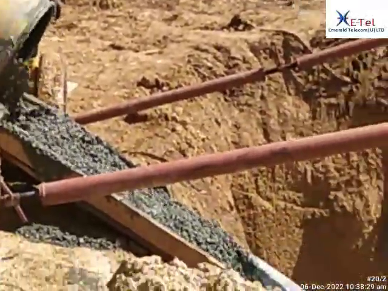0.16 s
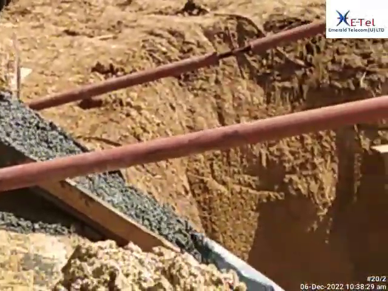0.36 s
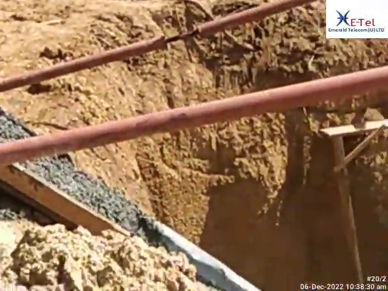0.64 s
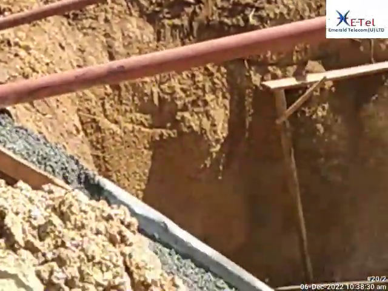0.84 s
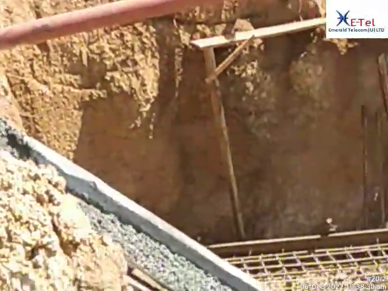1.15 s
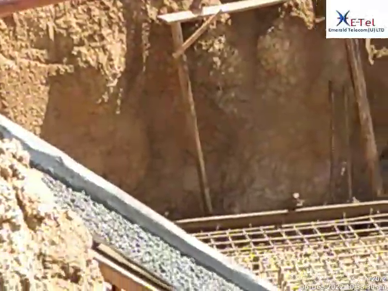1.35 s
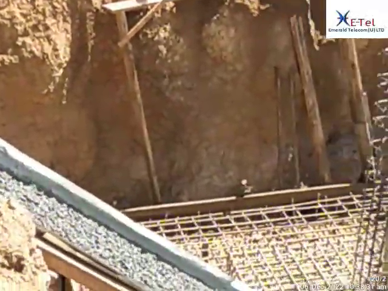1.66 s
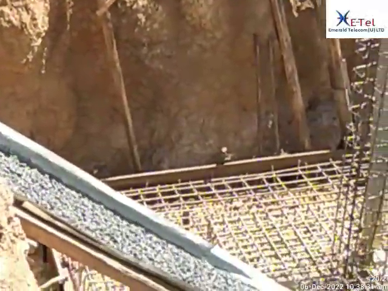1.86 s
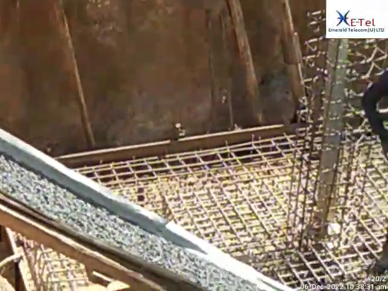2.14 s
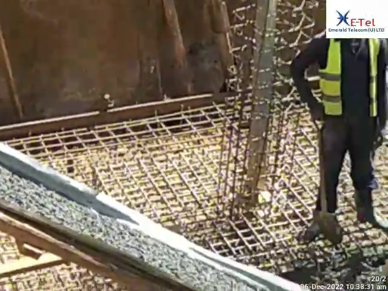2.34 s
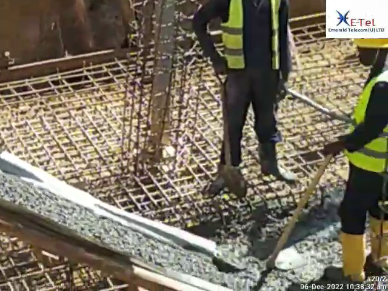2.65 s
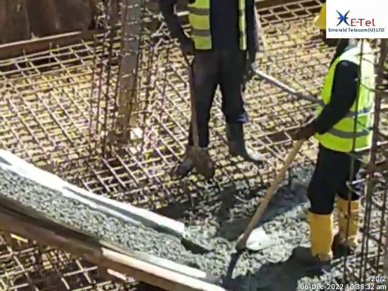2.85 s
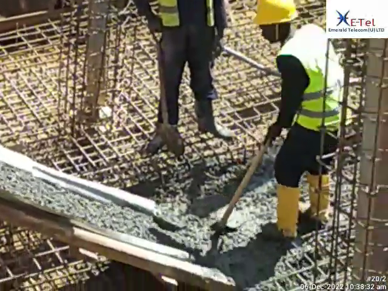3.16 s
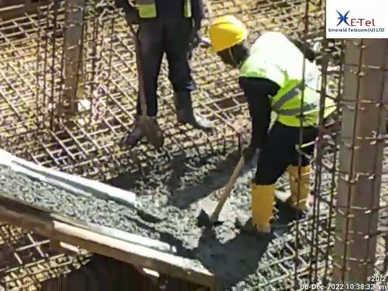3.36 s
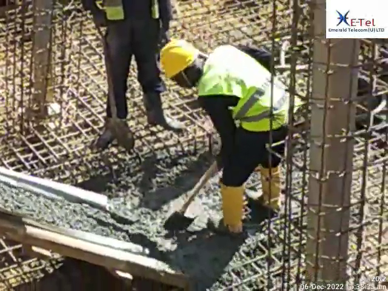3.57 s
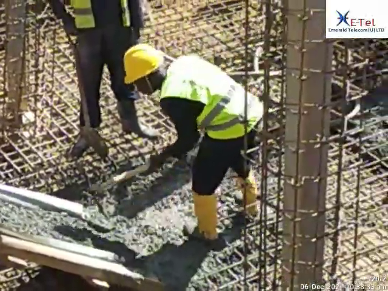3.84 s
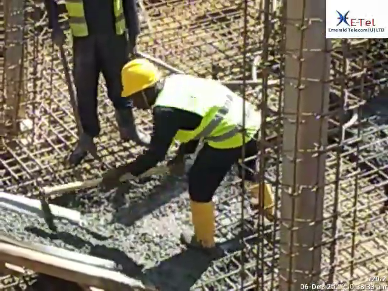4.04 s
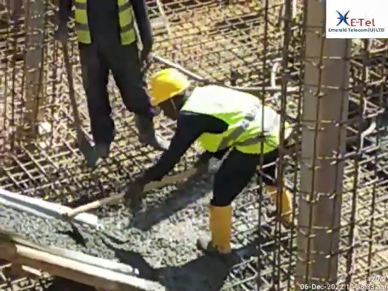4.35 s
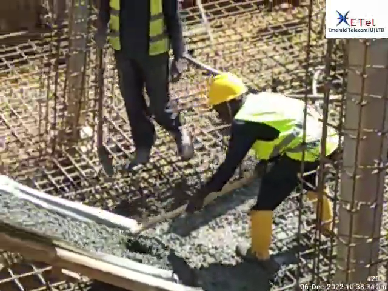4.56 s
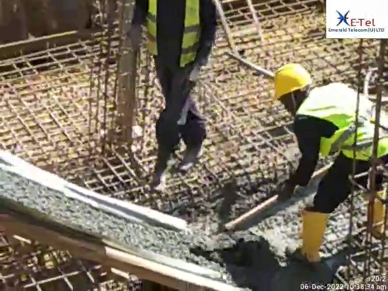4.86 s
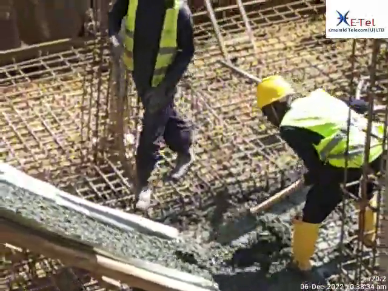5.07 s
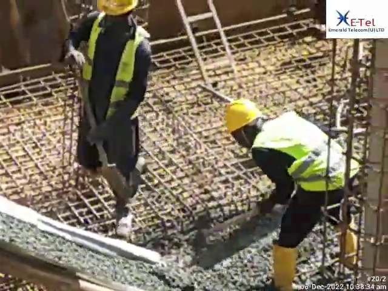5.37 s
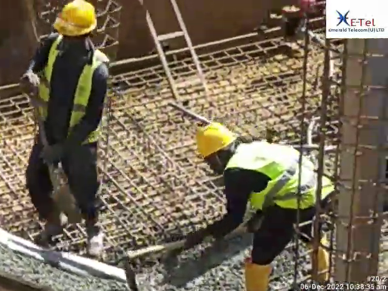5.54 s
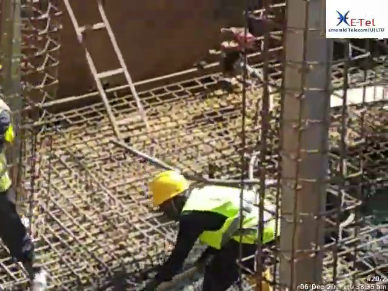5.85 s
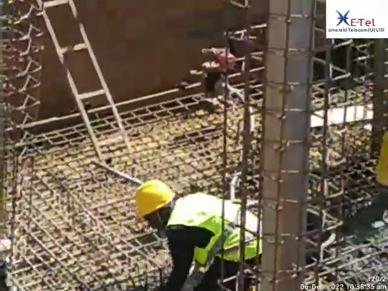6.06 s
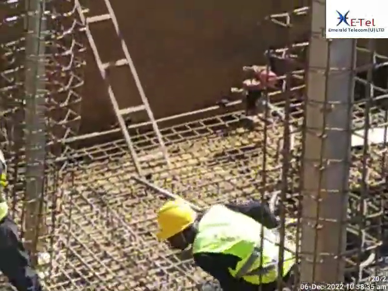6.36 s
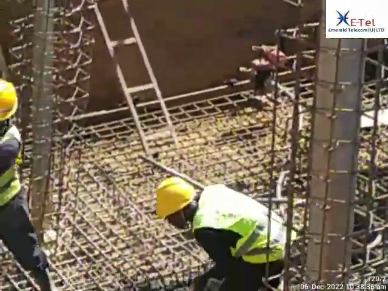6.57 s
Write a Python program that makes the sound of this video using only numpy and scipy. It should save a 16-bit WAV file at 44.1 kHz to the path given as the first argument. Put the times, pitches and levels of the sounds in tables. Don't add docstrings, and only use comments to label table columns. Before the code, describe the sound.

Outdoors at a construction pit, a single-cylinder mixer engine chugs steadily, about eleven dull, hollow knocks a second. Its drum rumbles and thumps unevenly as the load tumbles. Wet concrete slides down a chute throughout with gurgle, stony clatter and bright hiss, the low gurgle strongest at first. Brief hoe scrapes come midway and near the end. Phone microphone, thin bass, slightly gated, patchy treble.

```python
import sys
import numpy as np
from scipy import signal
from scipy.fft import rfft, irfft
from scipy.io import wavfile
from scipy.ndimage import uniform_filter1d

SR = 44100
rng = np.random.default_rng(int(sys.argv[2]) if len(sys.argv) > 2 else 0)


def natural_amplitude(level_db):
    exponent = np.asarray(level_db, float) / 20
    return 10 ** exponent


def to_wav(sig):
    pcm = np.clip(np.atleast_2d(sig), -1, 1) * 32767
    pcm = np.round(pcm).astype(np.int16)
    wavfile.write(sys.argv[1], SR, pcm.T)


N = 295911


def evened(x):
    return x / np.sqrt(np.mean(x ** 2) + 1e-20)


def spectrum_db(points, hz):
    table_hz, db = np.transpose(points)
    return np.interp(np.log(hz + 1), np.log(table_hz + 1), db, -120, -120)


def coloured(noise, points):
    size = noise.shape[-1]
    return irfft(rfft(noise) * natural_amplitude(spectrum_db(points, np.fft.rfftfreq(size, 1 / SR))), size)


def follow(rows):
    return np.interp(np.arange(N) / SR, *np.transpose(rows))


def lumps(per_s):
    t = np.arange(0, N / SR + 1, 1 / 200)
    spread, phase = rng.random((2, 40, 1))
    waves = np.sin(2 * np.pi * (per_s * spread * t + phase))
    return np.interp(np.arange(N) / SR, t, evened(waves.sum(0)))


def resonate(x, hz, width):
    turn = np.exp(2j * np.pi * np.cumsum(hz * np.ones(len(x))) / SR)
    decay = np.exp(-np.pi * width / SR)
    return 2 * (turn * signal.lfilter([1 - decay], [1, -decay], x / turn)).real


def steadied(x, share, size):
    power = uniform_filter1d(x ** 2, size) + .03 * np.mean(x ** 2)
    return evened(x / power ** (share / 2))


def clumped(x, rows, length, reach):
    hz, t, z = signal.stft(x, SR, nperseg=1024, noverlap=768)
    s, db, near_hz = np.transpose(rows)[:, :, None]
    over_pitch = db * np.exp(-(np.log((hz + 1) / near_hz) / reach) ** 2)
    over_time = np.exp(-((t - s) / length) ** 2)
    return signal.istft(z * natural_amplitude(over_pitch.T @ over_time), nperseg=1024, noverlap=768)[1][:N]


# pitch in Hz, width in Hz, level in dB.
GEAR_TONES = [
    (1017, 6.2, -47.5),
    (770.7, 16, -47),
    (932, 14, -48),
]


def gear():
    tones = 0
    for hz, width, db in GEAR_TONES:
        once = resonate(rng.standard_normal(N), hz, width)
        tones = tones + natural_amplitude(db) * evened(resonate(once, hz, 3 * width))
    return tones


def patchy(points, patch_db, hole_db, flicker_db):
    frames = N // 128 + 6
    a, b, patches, holes = rng.standard_normal((frames, 257, 4)).T
    patches = evened(uniform_filter1d(uniform_filter1d(patches, size=4, axis=0), size=16, axis=1))
    holes = evened(uniform_filter1d(uniform_filter1d(holes, size=2, axis=0), size=24, axis=1))
    flicker = evened(uniform_filter1d(rng.standard_normal(frames), size=8))
    field_db = patch_db * patches - hole_db * np.clip(holes - 1.1, 0, 1.2) + flicker_db * flicker
    x = signal.istft((a + 1j * b) * natural_amplitude(field_db), nperseg=512, noverlap=384)[1][:N]
    return evened(coloured(x, points))


# frequency in Hz, spectral level in dB.
GURGLE_COLOUR = [(330, -3.5), (500, 4), (560, -2.5), (605, 0), (680, -2.5), (780, -3.5), (900, -9.5)]
SLOSH_COLOUR = [(700, -11), (820, 0.5), (950, 0), (1010, 2), (1110, -4), (1217, 1), (1300, -2.5),
                (1400, -2.5), (1700, -23)]
CLATTER_COLOUR = [(1300, -15), (1550, 0), (1700, -3.5), (2000, -1), (2270, 0.5), (2600, -3), (3300, -3),
                  (3900, -7.5)]
HISS_COLOUR = [(3100, -17.5), (3600, -7.5), (4200, -1), (4700, 1), (5200, -3.5), (5850, -5), (5900, -9),
               (6110, -7), (6150, -43.5)]
FIZZ_COLOUR = [(6090, -43), (6130, 0), (7640, 0.5), (7710, -23), (9400, -24), (10000, -31.5),
               (10500, -41.5), (11030, -50.5), (11080, -55.5)]
# time in seconds, level in dB.
FLOW_DB = [(0, 0.5), (1.2, 0.2), (1.75, -.5), (2.3, .5), (2.75, 0), (3.1, 1.5), (3.4, -1), (3.6, 1.5),
           (3.9, -1.5), (4.2, 0), (4.6, -1.3), (5.1, 0), (5.25, -2), (5.45, 0), (5.9, -0.7), (6.55, -0.1),
           (6.63, 0.5), (6.71, -2)]
# time in seconds, level in dB.
TURN_DB = [
    (0, 2.5),
    (1.2, 1),
    (2.2, 2),
    (3.0, -0.5),
    (3.8, .5),
    (4.7, -0.5),
    (5.4, 0.5),
    (6.2, -2),
    (6.71, 0.5),
]
# time in seconds, length in seconds, level over the hiss in dB.
HOE_SCRAPES = [
    (3.582, .006, 3.5),
    (3.597, 0.024, 2),
    (6.214, 0.014, 3),
]
# time in seconds, level in dB, pitch in Hz.
CHUTE_SWELLS = [(0.04, 7, 1320), (0.05, -4, 880), (0.14, -7, 1210), (0.25, 7, 1210), (0.37, 3.5, 1960),
                (0.54, -3, 1210), (0.84, -11, 634), (0.84, 12, 1040), (0.95, -13, 1030), (1.06, -9, 540),
                (1.23, -10, 1030), (1.26, 8.5, 590), (1.34, -12, 1120), (1.55, 9, 635), (1.62, -8, 1210),
                (1.62, 6, 1800), (1.75, -12, 1220), (1.79, -13, 540), (1.86, 3, 880), (1.89, 3, 540),
                (2.1, 6, 1210), (2.12, 6, 2310), (2.17, -11, 630), (2.37, -6, 2130), (2.73, 9, 550),
                (2.74, -6, 2120), (2.75, -9, 750), (2.86, -10, 540), (2.9, -9, 1300), (3.05, -17, 690),
                (3.09, 0, 1030), (3.19, -7, 950), (3.35, -10, 690), (3.61, -11, 690), (3.67, -9, 540),
                (3.78, 5, 950), (3.83, -2, 2140), (3.83, 7, 630), (4.07, 7, 580), (4.08, -12, 1210),
                (4.45, -7, 540), (4.47, 4, 1310), (4.56, -7, 540), (4.86, -5, 1210), (4.89, -13, 544),
                (5.11, -9, 540), (5.18, -6, 750), (5.25, -9, 1210), (5.35, -5, 1540), (5.42, -10, 540),
                (5.45, -9, 810), (5.52, 5.5, 540), (5.61, 7, 810), (5.75, -8, 1540), (5.99, 8, 750),
                (6.06, -7, 950), (6.38, 9, 1050), (6.59, -6, 4770), (6.62, 13, 750), (6.68, 9.5, 880),
                (0.46, -3, 3510), (0.61, 0, 2050), (0.66, -2, 1400), (0.68, 4.5, 4420), (0.71, 4.5, 1900),
               (0.79, 5, 1400), (0.95, -4.5, 1630), (1.01, 5, 1390), (1.11, -9, 1400), (1.3, 2.5, 2050),
               (1.32, -4, 4120), (1.37, -1, 2220), (1.5, 4.5, 3010), (1.67, -8, 1400), (1.8, -5, 1510),
               (1.89, 3.5, 2220), (2.03, -2, 2390), (2.38, -4, 3250), (2.44, -7.5, 1390), (2.57, 3, 2220),
               (2.62, -5, 1400), (2.64, -5, 1760), (2.74, -3.5, 4770), (2.78, -9, 1750), (2.87, 3, 1400),
               (3.13, 2, 2390), (3.23, -4.5, 2050), (3.3, 6, 4470), (3.38, -2, 4800), (3.45, 4.5, 2540),
               (3.71, -7, 1910), (3.76, 3, 1510), (3.84, -2, 1400), (3.98, 4, 1380), (4.15, 5.5, 2800),
               (4.25, -5, 1620), (4.34, -5, 1920), (4.93, 1, 2580), (5.13, -4.5, 1890), (5.35, -4, 1400),
               (5.37, -5.5, 2050), (5.69, 5, 2390), (5.79, -4, 2390), (5.8, -5, 1410), (5.92, 1.5, 2390),
               (6.11, -6, 1620), (6.22, 5, 5900), (6.48, 2, 1630), (6.56, -0.5, 1510), (6.62, 1.5, 1400),
               (6.69, -5, 4180), (6.69, 4, 1400), (1.11, 10, 1220), (1.28, 5.5, 1230), (1.63, 9, 810),
               (3.62, 7, 920), (3.83, -5, 2330), (5.36, 3, 4650), (6.09, 6, 1230), (2.44, 3, 1580)]
SURGES_PER_S = 7.0


def slide():
    t, flow_db, turn_db = np.arange(N) / SR, follow(FLOW_DB), follow(TURN_DB)
    scrape_db = sum(db * np.exp(-((t - s) / length) ** 2) for s, length, db in HOE_SCRAPES)

    fading_db = 6.0 * np.exp(-t / 1.7)
    gurgle_db = -37.0 + 0.37 * flow_db + 0.61 * turn_db + fading_db + 0.98 * lumps(SURGES_PER_S)
    gurgle = natural_amplitude(gurgle_db) * patchy(GURGLE_COLOUR, patch_db=0.76, hole_db=3.5, flicker_db=0)

    slosh_db = -33.5 + 1.0 * flow_db + 0.24 * turn_db + 0.69 * lumps(SURGES_PER_S)
    slosh = natural_amplitude(slosh_db) * patchy(SLOSH_COLOUR, patch_db=.5, hole_db=19.0, flicker_db=0)

    clatter_db = -32.5 + 0.68 * flow_db + .5 * scrape_db + 0.38 * lumps(SURGES_PER_S)
    clatter = natural_amplitude(clatter_db) * patchy(CLATTER_COLOUR, patch_db=0.12, hole_db=3.5, flicker_db=0)

    hiss_db = -32.5 + 0.8 * flow_db + .2 * turn_db + scrape_db + 0.14 * lumps(SURGES_PER_S)
    hiss = natural_amplitude(hiss_db) * patchy(HISS_COLOUR, patch_db=0.67, hole_db=10.0, flicker_db=0.52)

    fizz_db = 0.78 * hiss_db - .5 * turn_db - 20.5
    fizz = natural_amplitude(fizz_db) * patchy(FIZZ_COLOUR, patch_db=0.66, hole_db=4.0, flicker_db=0.5)

    chute = gurgle + slosh + clatter + hiss + fizz
    return clumped(chute, CHUTE_SWELLS, length=0.031, reach=0.1)


# pitch in Hz, resting level in dB, share of the churn, chance lumps in dB.
DRUM_LAYERS = [
    (105, -31.5, 0.27, 0.5),
    (165, -33.5, 1.25, 2.5),
    (280, -31, 0.97, 2),
]
# time in seconds, level in dB.
CHURN_DB = [(0, -3.5), (.45, 1.5), (.9, 0.5), (1.3, 1), (1.8, 2.5), (2.2, -0.5), (2.6, -1.5), (3.2, 0.5),
            (3.75, -1.5), (4.2, 0.5), (4.8, 0), (5.25, 1), (5.7, -1), (6.2, -2), (6.71, -3.5)]
# time in seconds, level over the rumble in dB, pitch in Hz.
LOAD_LANDINGS = [(0.04, 11.5, 165), (0.15, 5.5, 280), (0.28, 6.5, 105), (0.29, 3, 280), (0.72, 4.5, 105),
                 (1.14, 4.5, 165), (1.23, 2.5, 280), (1.47, 6.5, 165), (2.46, 9, 280), (2.67, 3.5, 165),
                 (2.69, 8, 280), (2.77, 5.5, 105), (2.98, 5, 105), (3.46, 2.5, 105), (3.53, 8, 165),
                 (3.72, 3.5, 165), (3.75, 8.5, 105), (3.9, 3, 165), (4.05, 4, 105), (4.82, 4, 105),
                 (5.28, 4.5, 280), (5.38, 2.5, 105), (5.73, 5, 280), (5.89, 4.5, 105), (5.94, 6.5, 165),
                 (6.1, 3, 105), (6.42, 4.5, 280), (6.51, 6, 105)]
# time in seconds, level in dB, pitch in Hz.
LOAD_LULLS = [(0.1, -6, 105), (0.19, -3, 105), (0.4, -8, 105), (0.43, -11.5, 165), (0.58, -4, 280),
              (1.28, -6.5, 105), (2.09, -10, 280), (2.12, -8, 105), (2.13, -19.5, 165), (2.5, -7.5, 105),
              (2.71, -13.5, 165), (2.9, -9, 105), (3.12, -10, 105), (3.58, -19, 105), (4.15, -14, 105),
              (4.32, -14, 105), (4.48, -9, 105), (4.48, -8, 165), (4.92, -7, 280), (5.06, -17, 105),
              (5.45, -7, 280), (5.53, -16.5, 105), (5.54, -3, 165), (5.71, -8, 105), (5.86, -9, 165),
              (6.01, -12.5, 105), (6.17, -8, 280), (6.45, -11.5, 105), (6.6, -10, 105)]
# time in seconds, level in dB, pitch in Hz.
RUMBLE_SWELLS = [(0.1, -7.5, 105), (0.19, -12, 165), (0.2, -11, 105), (0.36, -17.5, 165), (0.43, -13.5, 165),
                 (0.58, 13.5, 165), (0.6, -7.5, 105), (0.75, -10, 165), (0.77, -17, 105), (0.81, -7.5, 165),
                 (0.84, 12, 280), (0.86, 11, 105), (0.9, 7.5, 105), (1.2, 8.5, 105), (1.24, 6.5, 280),
                 (1.29, -11, 105), (1.44, -12, 280), (1.46, -11, 105), (1.82, -12, 280), (1.85, -11, 105),
                 (1.92, -10, 105), (2.06, 14.5, 165), (2.15, -15, 165), (2.32, -12, 105), (2.39, 11, 280),
                 (2.42, -18, 105), (2.5, -8.5, 105), (2.73, -16.5, 105), (2.78, -14, 165), (2.92, 11, 165),
                 (3.07, 11.5, 105), (3.08, 11, 165), (3.18, -14, 105), (3.27, -9.5, 165), (3.39, 11, 280),
                 (3.57, -14, 105), (3.65, -11.5, 105), (3.9, 8.5, 165), (4.08, -15, 165), (4.13, 10.5, 105),
                 (4.15, 11, 165), (4.17, -14, 105), (4.2, 9.5, 165), (4.29, 10, 280), (4.41, -14, 280),
                 (4.49, -6.5, 105), (4.53, 9, 165), (4.7, -11, 105), (4.78, -9.5, 165), (4.87, -13, 105),
                 (4.94, -8.5, 105), (5.13, 6, 165), (5.18, 4, 105), (5.33, -11, 105), (5.72, 14, 165),
                 (5.86, -14, 165), (6.27, -16, 105), (6.4, -12.5, 165), (6.6, -8, 165), (6.64, 10.5, 165)]
TUMBLES_PER_S = 13.0
REACH = .33
BASS_LEAD = 0.71


def load():
    t, levels = np.arange(0, N / SR + 1, 1 / 500), []
    # rows, length in seconds, share
    moves = ((LOAD_LANDINGS, .038, 1), (LOAD_LULLS, .03, 1), (RUMBLE_SWELLS, 0.019, 0.65))
    for hz, rest_db, churn, lumps_db in DRUM_LAYERS:
        moves_db = np.zeros(len(t))
        for rows, length, share in moves:
            for s, db, near_hz in rows:
                off_time = (t + BASS_LEAD / hz - s) / length
                off_pitch = np.log(near_hz / hz) / REACH
                moves_db += share * db * np.exp(-off_time ** 2 - off_pitch ** 2)
        level_db = rest_db + churn * follow(CHURN_DB) + lumps_db * lumps(TUMBLES_PER_S)
        levels.append(level_db + np.interp(np.arange(N) / SR, t, moves_db))
    return levels


def shell(modes):
    hz = np.fft.rfftfreq(N, 1 / SR)
    power = 0
    for mode_hz, width, db in modes:
        peak = natural_amplitude(2 * db) / width / (1 + (2 * (hz - mode_hz) / width) ** 2)
        power = power + peak / (1 + ((hz - mode_hz) / (1.37 * width)) ** 2)
    return steadied(irfft(rfft(rng.standard_normal(N)) * np.sqrt(power), N), 0.74, size=1300)


# pitch in Hz, width in Hz, level in dB.
SHELL_MODES = [
    [(125, 25, -14), (143, 31, -2.5), (166.5, 3.3, 2), (196, 12, -1.5)],
    [(235, 13.5, 0), (254, 24, -5.5), (278, 27, -1.5), (298.7, 15, -6.5), (340.5, 12, -8.5), (364, 17, -3),
     (425, 28, -5.5)],
]


def drum(boom_db, low_db, high_db):
    width = 40
    hz = 99 + 0.3 * (boom_db - boom_db.mean())
    boom = resonate(resonate(rng.standard_normal(N), hz, width), hz, 0.85 * width)
    boom = natural_amplitude(boom_db) * steadied(boom, 0.8, size=1300)
    return boom + natural_amplitude(low_db) * shell(SHELL_MODES[0]) + natural_amplitude(high_db) * shell(SHELL_MODES[1])


# time in seconds, firings per second.
ENGINE_SPEED = [
    (0, 11.4905),
    (.5, 11.6277),
    (1.9, 11.7688),
    (3, 11.6172),
    (4, 11.4404),
    (5.3, 11.1054),
    (6.71, 10.7412),
]


def firings():
    t = np.arange(-.4, 7.1, 1 / 2000)
    cycles = np.cumsum(np.interp(t, *np.transpose(ENGINE_SPEED))) / 2000
    cycles -= np.interp(.0326, t, cycles)
    return np.interp(np.arange(-4, 80), cycles, t)


# frequency in Hz, spectral level in dB.
FRAME_COLOUR = [(60, -46.5), (90, -1), (170, -5.5), (280, -10), (340, -6), (450, -17.5), (600, -21),
                (1200, -17), (1600, -36), (3000, -38)]


def frame():
    at, size, out = firings(), 6000, np.zeros(N + SR)
    rattles = coloured(rng.standard_normal((3, size)), FRAME_COLOUR)
    for k, rattle in enumerate(rattles * np.hanning(size)):
        train = np.zeros(N + SR)
        train[np.round((at + .5) * SR).astype(int)] = np.cos(2 * np.pi * (.11 * at + k / 3))
        out += signal.oaconvolve(train, rattle)[:N + SR]
    return natural_amplitude(-30) * evened(out[SR // 2:][:N])


# delay after the firing at usual speed in seconds, pitch in Hz,
# swell time in seconds, level in dB, wobble in dB.
CYCLE_RINGS = [(-.008, 413.4, 0.0016, -17, 0.6), (-.003, 289, 0.0023, -28, 1.5),
               (-.002, 445, 0.0051, -29, 3), (.025, 400, 0.0037, -34, 3.5), (-.017, 149, 0.0032, -29.5, 2),
               (-.006, 694, 0.0014, -37, 3), (-.006, 1210, 0.0022, -34, 1), (0.039, 1218, 0.0018, -30.5, 2),
               (0.0514, 1000, 0.0019, -36, 1.5), (.047, 790, 0.0016, -38, 3), (.021, 1200, .0016, -39, 5.5),
               (.046, 176, 0.0028, -29, 1.5), (-.002, 124, 0.0027, -32.5, 5.5)]
# time in seconds, level in dB.
UNEVEN_FIRINGS = [(0.03, -1), (0.29, -6.5), (0.38, -3), (0.55, -4.5), (0.64, -2.5), (0.72, -2), (0.89, -2),
                  (0.98, 0.5), (1.07, 0), (1.15, -4), (1.24, -3.5), (1.32, -0.5), (1.41, -1), (1.66, -3.5),
                  (1.75, -1.5), (1.83, -2), (2.0, 1), (2.09, -2), (2.17, 0), (2.26, -9.5), (2.34, -3),
                  (2.43, -9), (2.52, 0.5), (2.69, 1), (2.77, -2.5), (2.94, -2), (3.03, 0.5), (3.2, 3),
                  (3.29, 0.5), (3.38, -7), (3.46, -1), (3.55, 1), (3.72, 1), (3.9, -1), (3.98, 1.5),
                  (4.07, 1.5), (4.16, 0), (4.34, -0.5), (4.51, 0), (4.6, 0), (4.69, 1), (4.87, -3.5),
                  (5.05, -3), (5.5, -3.5), (5.68, -2.5), (5.86, 2), (5.95, -0.5), (6.04, -2), (6.13, 2),
                  (6.23, -1.5), (6.32, -3.5), (6.41, -2), (6.5, -1.5), (6.6, -2.5)]
USUAL_SPEED = 11.6
POT_TOP_HZ, VALVE_SHARE = 600, .3


def knocks():
    at, t, out = firings(), np.arange(2400) / SR, np.zeros(N + 2 * SR)
    luck = rng.standard_normal((len(at), 2))
    strength_db = .4 * luck[:, 0] + np.interp(at, *np.transpose(TURN_DB))
    for s, db in UNEVEN_FIRINGS:
        strength_db[np.argmin(abs(at - s))] += db
    warming = 1 - 0.015 * np.exp(-at / 1.2)
    pitch = warming + .003 * strength_db + .014 * luck[:, 1]
    stretch = np.exp(.12 * np.clip(luck[:, :1], -1, 2))
    cycle = USUAL_SPEED * np.gradient(at)
    for delay, hz, swell, db, wobble_db in CYCLE_RINGS:
        top = 4 * swell
        age = np.maximum(1 + (t - top) / (top * stretch), 0)
        shapes = (age * np.exp(1 - age)) ** 4 / np.sqrt(stretch)
        share = 1 if hz < POT_TOP_HZ else VALVE_SHARE
        gains = natural_amplitude(db + share * strength_db + wobble_db * rng.standard_normal(len(at)))
        starts = np.round((at + (delay + top) * cycle - top + 1) * SR).astype(int)
        for start, gain, factor, shape in zip(starts, gains, pitch, shapes):
            ring = np.sin(2 * np.pi * hz * (top + factor * (t - top)))
            out[start:start + len(t)] += gain * shape * ring
    return out[SR:SR + N]


# time in seconds, level in dB, pitch in Hz.
MIXER_SWELLS = [(0.19, -10, 210), (0.2, -12, 120), (0.2, 7, 80), (0.36, -15, 210), (0.43, -11, 170),
                (0.43, 13, 80), (0.53, -3, 80), (0.7, 8, 100), (0.72, 4, 170), (0.77, -11, 170),
                (0.85, -4, 450), (0.86, -8, 80), (0.95, 6.5, 169), (0.97, -12, 80), (1.12, -4, 210),
                (1.19, -18, 372), (1.36, -12, 450), (1.38, 6.5, 210), (1.52, -6, 80), (1.66, -4, 210),
                (1.89, -11, 170), (2.01, -12, 120), (2.29, 10, 450), (2.51, -8, 80), (2.64, -8, 310),
                (2.77, -7, 170), (2.79, 7.5, 312), (3.02, -11, 100), (3.12, -10, 100), (3.15, 13, 170),
                (3.21, -8, 120), (3.42, -6, 80), (3.56, -14, 100), (4.02, 8, 170), (4.21, 4, 450),
                (4.5, -11, 100), (4.71, 5, 80), (4.87, -10, 100), (5.08, 3, 250), (5.19, -9, 170),
                (5.37, 8, 100), (5.47, 10, 170), (5.72, -8, 100), (5.81, 9, 100), (5.89, 6, 308),
                (5.99, 8.5, 454), (6.01, 6, 170), (6.06, -9, 80), (6.22, -6, 80), (6.36, -12, 80),
                (6.36, 3, 210), (6.6, -11, 140), (1.14, 6, 140), (1.23, 7.5, 256), (1.34, -2, 155),
                (1.58, -6, 172), (2.46, -5, 313), (2.79, 7, 115), (3.04, -8, 256), (3.55, -8, 115),
                (3.9, 3.5, 155), (6.32, 6.5, 346)]


def scene():
    boom_db, low_db, high_db = load()
    rattle = frame()
    feet = signal.sosfiltfilt(signal.butter(3, 135, fs=SR, output="sos"), rattle)
    feet_gain = natural_amplitude(0.7 * (boom_db + 30.5))
    casing_gain = natural_amplitude(0.26 * ((low_db + high_db) / 2 + 28.5))
    shaken = feet_gain * feet + casing_gain * (rattle - feet)
    mixer = knocks() + shaken + drum(boom_db, low_db, high_db)
    mixer = clumped(mixer, MIXER_SWELLS, length=0.027, reach=0.18)
    return (mixer + slide() + gear())[None]


def band_limit(x):
    return signal.sosfilt(signal.butter(12, 11200, fs=SR, output="sos"), x)


# frequency in Hz, dB taken per dB under the usual level.
GATE_DEPTH = [
    (200, 0.3),
    (450, 0.54),
    (700, 0.33),
    (2000, 0.6),
    (5000, 0.43),
    (9000, 0.5),
]
# frequency in Hz, dB taken per dB.
PATCH_DEPTH = [
    (900, 2.6),
    (1900, 1.1),
    (3200, 2.6),
    (4800, 1.5),
    (7000, 2.1),
]


def record(dry):
    cut = signal.sosfilt(signal.butter(6, 80.0, "high", fs=SR, output="sos"), dry)
    hz, _, z = signal.stft(cut, SR, nperseg=2048, noverlap=1536)
    near = uniform_filter1d(abs(z) ** 2 + 1e-20, size=3, axis=1)
    usual = uniform_filter1d(uniform_filter1d(near, size=60, axis=2), size=3, axis=1)
    depth = np.interp(hz, *np.transpose(GATE_DEPTH))[:, None]
    gate_db = depth * (np.clip(10 * np.log10(near / usual) - 4.0, -16, 0) + 2.63)
    patch = uniform_filter1d(uniform_filter1d(near, size=3, axis=1), size=4, axis=2)
    patch_db = 10 * np.log10(patch / usual)
    patch_depth = np.interp(hz, *np.transpose(PATCH_DEPTH)) * (hz > 520)
    gate_db += patch_depth[:, None] * np.clip(patch_db + 2.0, -5, 0)
    gated = signal.istft(z * natural_amplitude(gate_db), nperseg=2048, noverlap=1536)[1][:, :N]
    return band_limit(gated)


dry = scene()
out = record(dry)
to_wav(out)
```